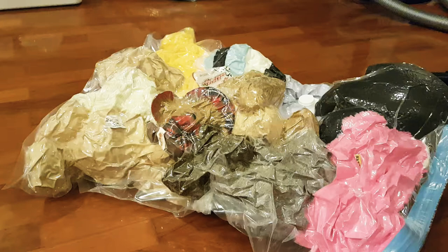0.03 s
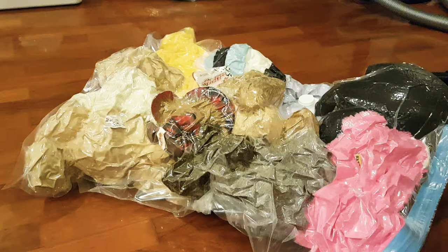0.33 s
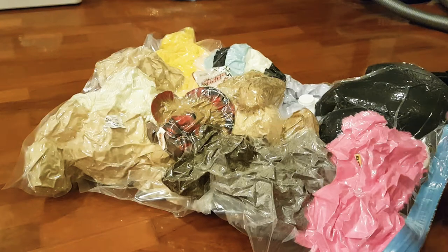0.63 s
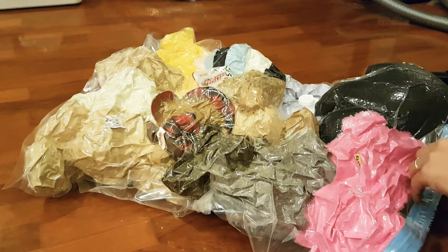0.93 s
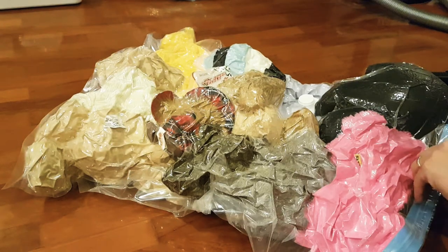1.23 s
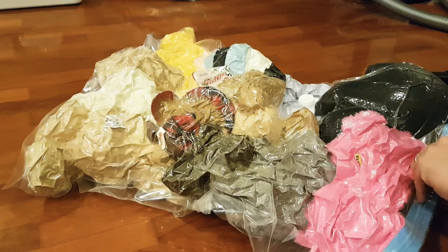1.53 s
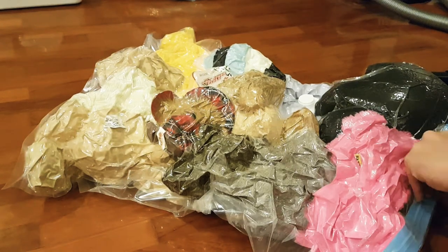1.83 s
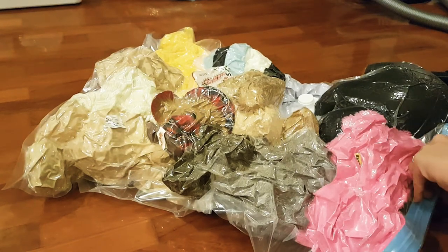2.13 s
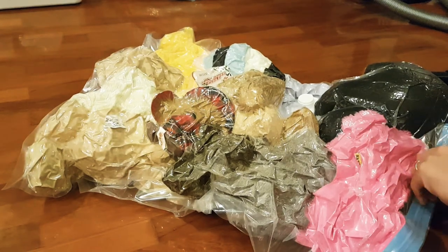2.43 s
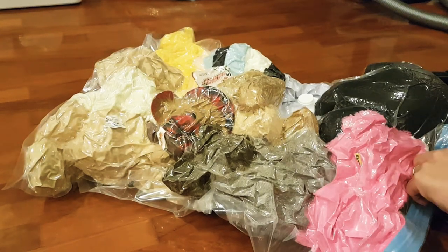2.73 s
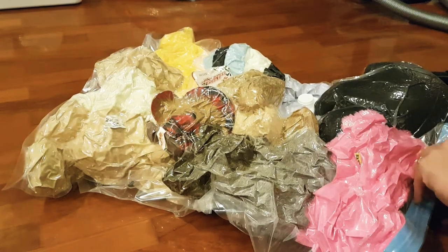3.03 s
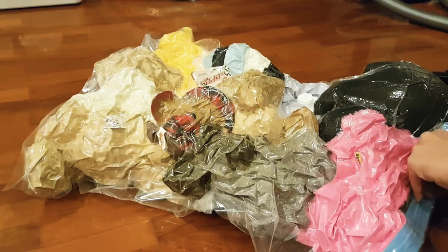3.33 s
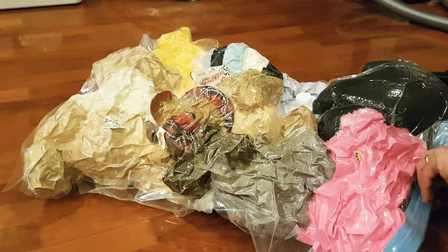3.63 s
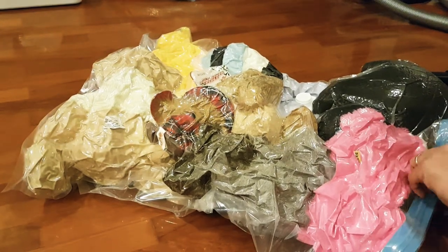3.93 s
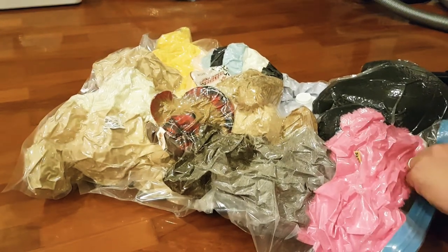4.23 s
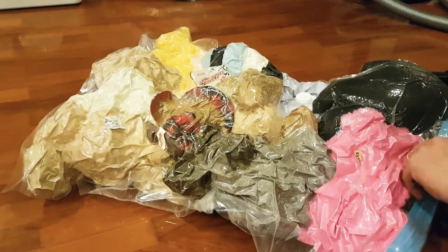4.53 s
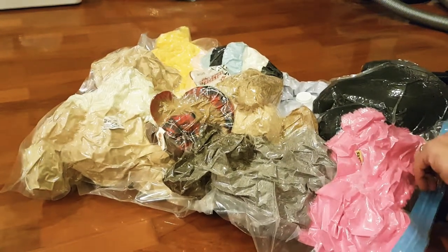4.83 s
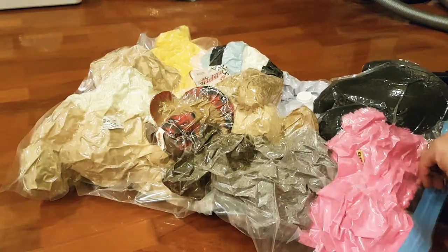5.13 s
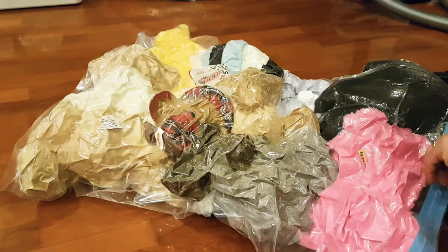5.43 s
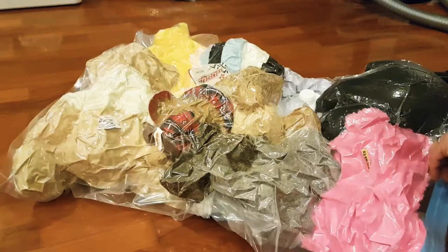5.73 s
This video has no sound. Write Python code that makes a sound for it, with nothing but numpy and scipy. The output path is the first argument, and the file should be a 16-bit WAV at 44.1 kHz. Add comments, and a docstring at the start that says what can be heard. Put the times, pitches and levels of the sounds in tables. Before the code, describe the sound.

A plastic bag crinkles and clicks under a hand, then its seal crunches open and air hisses in over popping creases.

```python
"""Unzipping a vacuum-packed bag of clothes

A hand works at the zip of a plastic bag on a wooden floor, off to the right. The taut film rustles,
fingertips skid, creases snap and the bundle bumps the boards. Then the seal parts with a crunch and
air hisses in through the slot, while the slackening bag swells and pops in a quiet, fairly live room."""
import sys
import numpy as np
from scipy import signal
from scipy.fft import rfft, irfft
from scipy.io import wavfile

SR = 44100
rng = np.random.default_rng(int(sys.argv[2]) if len(sys.argv) > 2 else 0)


def pcm_store(signal):
    """Save signal as 16-bit PCM."""
    levels = np.round(np.clip(np.atleast_2d(signal), -1, 1) * 32767)
    wavfile.write(sys.argv[1], SR, levels.astype(np.int16).T)


N = 263277
TIME = np.arange(N) / SR
PARTS_S, RIP_S, OPEN_S = 4.358, 4.378, 4.415   # the zip: first give, hardest pull, end of the rip
RIP_FADE_DB_PER_S = 60

# finger grips: (firmest at [s], release [s], rub [dB], muffled push [dB], fine crinkle [dB])
GRIPS = [(1.074, 0.22, -62.5, -61.5, -67), (1.667, 0.02, -51.5, -46.5, -70), (1.765, 0.43, -66.5, -66, -59),
         (2.013, 0.12, -54, -53, -67), (2.297, 0.065, -63, -61, -76), (2.51, .1, -53.5, -51.5, -55),
         (2.661, 0.12, -65, -69, -71), (2.881, 0.088, -74, -58.5, -57), (2.996, 0.11, -54.5, -53, -56),
         (3.249, 0.14, -58, -62, -57), (3.399, 0.045, -49.5, -48.5, -51), (3.515, 0.09, -58, -54, -66),
         (3.649, 0.13, -70, -62, -57.5), (3.778, 0.055, -55.5, -58, -55.5),
         (3.998, 0.29, -60.5, -59.5, -58), (4.122, .08, -56, -68, -52), (4.192, 0.34, -63, -55.5, -70),
         (4.319, 0.2, -64, -68, -70)]


def from_db(db):
    return 10 ** (np.asarray(db) / 20)


def rms_one(x):
    return x / np.sqrt(np.mean(x ** 2) + 1e-20)


def energy_one(x):
    return x / np.sqrt(np.sum(x ** 2) + 1e-20)


def at_hz(points, hz, column=1):
    """One column of a table, read on a log-frequency axis."""
    points = np.array(points)
    return np.interp(np.log(hz), np.log(points[:, 0]), points[:, column])


def cut(x, hz, kind, order=2):
    """Butterworth filter."""
    return signal.sosfilt(signal.butter(order, np.clip(hz, 10, .45 * SR), kind, fs=SR, output="sos"), x)


def colour(x, spectrum, size=8192):
    """Minimum-phase EQ through points of (frequency [Hz], gain [dB])."""
    hz = np.maximum(np.arange(size // 2 + 1) * SR / size, 1)
    cepstrum = irfft(np.log(from_db(at_hz(spectrum, hz))))
    cepstrum[1:size // 2] *= 2
    cepstrum[size // 2 + 1:] = 0
    return signal.oaconvolve(x, irfft(np.exp(rfft(cepstrum))))[:len(x)]


def delay(x, s):
    return np.interp(TIME - s, TIME, x, left=0)


def add(out, s, sound):
    """Mix a short sound in at a time."""
    start = int(s * SR)
    out[start:start + len(sound)] += sound[:N - start]


def surge(s, release_s, rise):
    """Envelope peaking at s, 20 dB down after the release; rise is a share of the release."""
    return 10 ** -np.minimum(np.maximum((s - TIME) / rise, TIME - s) / release_s, 10)


def opened(attack_s):
    """Gate: zero while the bag is sealed, one once the zip has parted."""
    return np.clip((TIME - PARTS_S) / attack_s + .5, 0, 1)


def diffuse(size, alike_hz=800):
    """Stereo noise from all sides: nearly mono in the bass, wide in the treble."""
    mid, side = rng.standard_normal((2, size))
    side = cut(side, alike_hz, "high", order=1)
    side += 0.19 * cut(rng.standard_normal(size), alike_hz, "low", order=1)
    return np.array([mid + side, mid - side]) / np.sqrt(2)


def grains(spectrum, per_s, spread_db, smooth, clump_hz=60):
    """Tiny slips of plastic, uneven in size and clumped in time, over smooth friction; rms 1."""
    knots = rng.standard_normal(4096)
    clumping = rms_one(np.interp(TIME * clump_hz, np.arange(len(knots)), knots))
    slips = rng.random(N) < per_s * from_db(4 * clumping) / SR
    sizes = from_db(spread_db * np.minimum(rng.exponential(1, N), 3.5)) * rng.choice([-1, 1], N)
    return rms_one(colour(rms_one(slips * sizes) + smooth * rng.standard_normal(N), spectrum))


def room_tone(rumble_db=-61.07, hiss_db=-71, lean_db=2):
    """The bed: steady house rumble, and thin microphone hiss that leans left."""
    # rumble of the house: (frequency [Hz], level [dB])
    spectrum = [(15, -40), (30, -26), (50, -3.5), (65, -2.5), (110, -0.5), (200, -5), (280, -7.5),
                (360, -5), (500, -11), (640, -10), (735, -12.5), (900, -13.5), (1300, -22), (2500, -24.5),
                (5000, -34), (8000, -39), (16000, -27)]
    rumble = rms_one(np.array([colour(side, spectrum) for side in diffuse(N)]))
    hiss = cut(rng.standard_normal((2, N)), 10700, "high", order=4) * from_db([[lean_db], [-lean_db]])
    return from_db(rumble_db) * rumble + from_db(hiss_db) * hiss


def hum():
    """Faint house hum: narrow bands of noise heard as wavering tones."""
    # hum tones: (pitch [Hz], width [Hz], level [dB])
    tones = [(118.8, 22, -73.5), (736, 26, -77)]
    return sum(from_db(db) * rms_one(cut(rng.standard_normal(N), [hz - wide / 2, hz + wide / 2], "band"))
               for hz, wide, db in tones)


def handling(push_trim_db=-2, rub_trim_db=-3.5, crinkle_trim_db=-4):
    """Fingers press the packed clothes, slide on the film and crinkle it."""
    # tone of the muffled push, the rub and the fine crinkle: (frequency [Hz], level [dB])
    push_eq = [(60, -0.5), (150, -5.5), (350, 1), (650, -7), (1000, -11), (2000, -30.5)]
    rub_eq = [(300, -23), (700, -2), (1100, 4.5), (1750, -1.5), (2300, 0), (5000, -38)]
    crinkle_eq = [(1000, -36), (2500, 12.5), (4500, 6.5), (6500, 0.5), (9000, 3), (16000, 4.5)]
    power = from_db([[-72.5], [-74], [-71]]) ** 2   # the resting hand: rub, push, crinkle
    for s, release_s, *levels in GRIPS:
        power = power + np.outer(from_db(levels), surge(s, release_s, rise=0.65)) ** 2
    rub, push, crinkle = np.sqrt(power)
    push *= from_db(push_trim_db) * grains(push_eq, per_s=700, spread_db=1.3, smooth=0.4)
    rub *= from_db(rub_trim_db) * grains(rub_eq, per_s=900, spread_db=1.2, smooth=0.78)
    crinkle *= from_db(crinkle_trim_db) * grains(crinkle_eq, per_s=600, spread_db=2, smooth=0.65)
    touching = np.interp(TIME, [.7, .9, 4.34, 4.38], [0, 1, 1, 0])
    return touching * (push + rub + crinkle)


def ring(t, hz, cycles, build=0.59):
    """A mode of the film builds up quickly and decays by 60 dB over the given cycles; energy 1."""
    attack = 1 - np.exp(-build * t * hz)
    return energy_one(np.sin(2 * np.pi * hz * t) * from_db(-60 * t * hz / cycles) * attack)


def snaps(panel_cycles=6.1, rise_s=0.00042, crack_s=0.00018, shiver_s=0.0016, level_window_s=.004):
    """A crease flips: a short pitched crack, a shiver of the film and a few swings of the panel."""
    # buckling creases:
    # (time [s], panel pitch [Hz], panel level [dB], crack pitch [Hz], crack level [dB], sharp edge [dB])
    creases = [(1.0642, 2200, -51.5, 2930, -59, -78), (1.0888, 2030, -52, 4360, -50.5, -68),
               (1.104, 1650, -53.5, 3040, -56, -70), (1.1764, 1670, -48, 2840, -66, -83),
               (1.62, 1980, -58, 2910, -80, -88), (1.6703, 2300, -46.5, 7000, -50, -61),
               (1.6779, 2430, -44, 4750, -36, -45.5), (1.7906, 1780, -59, 4400, -56, -78),
               (1.892, 1100, -61, 5800, -53, -73), (1.9128, 860, -80, 7700, -50, -54.5),
               (2.0051, 910, -53, 5800, -44, -64), (2.0113, 1690, -46.5, 4660, -40.5, -59),
               (2.2364, 1800, -57, 4100, -48.5, -82), (2.2882, 1980, -54, 2910, -74, -85),
               (2.4607, 1840, -43, 6900, -42.5, -53), (2.4905, 1790, -48, 7800, -40.5, -53),
               (2.525, 940, -52.5, 7270, -68, -80), (2.5496, 1970, -69, 2910, -49, -69),
               (2.6411, 2030, -51.5, 5400, -53.5, -69), (2.879, 1950, -56, 6600, -52, -66),
               (3.0063, 1590, -48, 6200, -46, -55), (3.042, 2120, -47.5, 7900, -38.5, -44.5),
               (3.1503, 1530, -50.5, 3370, -72, -84), (3.1896, 1260, -55, 5030, -54, -69),
               (3.2447, 900, -69, 4240, -54, -52), (3.5106, 810, -51.5, 4520, -63, -72),
               (3.6103, 2430, -45.5, 3650, -43.5, -64), (3.643, 2000, -46.5, 3870, -39.5, -50),
               (3.7197, 1670, -47.5, 4060, -44, -84), (3.771, 1890, -48, 3970, -48, -62),
               (3.8317, 1380, -48, 2980, -56, -81), (3.9016, 1700, -44.5, 8300, -40.5, -55),
               (3.9486, 2630, -76, 2860, -37, -55), (3.9885, 2250, -46.5, 7950, -43.5, -59),
               (4.002, 1550, -54, 7500, -39.5, -60), (4.0363, 2170, -44.5, 4570, -48, -60),
               (4.0645, 1500, -48.5, 7800, -42, -56), (4.0772, 1970, -48.5, 7700, -48, -49.5),
               (4.109, 1790, -33.5, 7540, -48, -49), (4.2907, 816, -53.5, 5770, -61, -72),
               (4.3582, 840, -46, 6990, -73, -73), (4.3659, 810, -50, 4070, -58, -61),
               (4.3756, 1380, -29, 2920, -28.5, -40.5), (4.3886, 1950, -30, 2910, -43, -55),
               (4.3803, 2190, -41, 5430, -23, -51), (4.3962, 2000, -32, 5400, -30, -41),
               (4.4071, 1020, -44, 8200, -29.5, -43), (4.4868, 1340, -38, 7850, -40, -56),
               (4.5412, 870, -39, 2910, -51, -54), (4.552, 1340, -38.5, 3330, -55, -58),
               (4.5839, 2270, -36.5, 2910, -57, -59), (4.6409, 1880, -23.5, 2920, -28, -63),
               (4.9647, 2400, -43.5, 2910, -40, -67), (5.0688, 895, -42.5, 5420, -49, -55),
               (5.2, 2000, -35, 2930, -62, -62), (5.208, 1130, -42.5, 7550, -31.5, -44),
               (5.2703, 2190, -35.5, 3140, -36.5, -45), (5.3051, 800, -35, 3630, -38, -63),
               (5.3606, 784, -44, 8100, -63, -64), (5.483, 980, -45.5, 2910, -47, -74),
               (5.4959, 2140, -34.5, 2910, -41, -50), (5.501, 1850, -51, 4380, -35, -50),
               (5.6428, 2240, -30.5, 2770, -33, -47), (5.6895, 1640, -41.5, 7750, -40.5, -40),
               (5.7888, 1710, -39.5, 4230, -42, -68), (5.8008, 2010, -40.5, 2910, -54, -73),
               (5.8275, 900, -30, 3880, -53, -68), (5.84, 1900, -39, 2910, -55, -71),
               (5.867, 2440, -37, 2980, -41, -47.5), (5.8726, 1220, -33, 2910, -59, -65)]
    out, t = np.zeros(N), np.arange(1024) / SR
    burst = (np.exp(-t / crack_s) + 0.4 * np.exp(-t / shiver_s)) * (1 - np.exp(-t / rise_s))
    for s, hz, panel_db, crack_hz, crack_db, edge_db in [*creases, *small_creases(), *zip_jerks()]:
        jolts = rng.standard_normal((3, len(t))) * burst
        overtone = 0.48 * rng.standard_normal() * ring(t, 1.61 * hz, panel_cycles)
        flutter = 0.81 * energy_one(cut(jolts[0], [0.37 * hz, 1.62 * hz], "band"))
        panel = from_db(panel_db + 1) * energy_one(ring(t, hz, panel_cycles) + overtone + flutter)
        ping = 0.79 * ring(t, crack_hz, cycles=18)
        click = energy_one(cut(jolts[1], [2700, 6800], "band"))
        crack = from_db(crack_db - 3.5) * energy_one(ping + click)
        edge = from_db(edge_db + 8) * energy_one(cut(jolts[2], [9000, 16500], "band", order=3))
        add(out, s, (panel + crack + edge) * np.sqrt(level_window_s * SR))
    return out


def small_creases(per_grip=2, scatter_s=.016, panel_hz=1500, crack_hz=5000):
    """Every grip flips lesser creases, louder when it is firmer; rows for snaps()."""
    rows = []
    for s, _, rub_db, _, crinkle_db in GRIPS:
        for when, size, panel, crack in rng.uniform(-1, 1, (per_grip, 4)):
            size_db = 3 * size
            rows.append((s + scatter_s * when, panel_hz * 1.4 ** panel, rub_db - 3 + size_db,
                         crack_hz * 1.6 ** crack, crinkle_db - 2 + size_db, crinkle_db - 13 + size_db))
    return rows


def skids(q=9.4, slips_per_s=1500, smooth=0.53, trim_db=-3):
    """Fingertips stick and slip, setting a small patch of taut film singing hoarsely."""
    # fingertip strokes: (midpoint [s], length [s], pitch [Hz], level [dB])
    strokes = [(1.773, 0.14, 4450, -62), (1.85, 0.22, 1180, -65), (1.997, 0.036, 5270, -58),
               (2.126, 0.077, 1520, -60.5), (2.305, 0.11, 6100, -71.5), (3.005, 0.023, 6000, -44),
               (3.212, 0.076, 1110, -55.5), (3.217, 0.12, 4370, -61.5), (3.391, 0.054, 6000, -56.5),
               (3.47, .15, 1630, -56), (3.489, 0.097, 1150, -58), (3.662, 0.044, 3800, -61),
               (3.837, 0.063, 2980, -60), (4.123, 0.037, 1760, -48)]
    out = np.zeros(N)
    for s, length_s, hz, db in strokes:
        size = int(length_s * SR)
        slips = rng.standard_normal(N) * (rng.random(N) < slips_per_s / SR)
        friction = (rms_one(slips) + smooth * rng.standard_normal(N))[:size]
        squeak = rms_one(signal.lfilter(*signal.iirpeak(hz, q, fs=SR), friction))
        arch = np.sin(np.pi * np.arange(size) / size)
        add(out, s - length_s / 2, from_db(db + trim_db) * squeak * arch)
    return out


def bumps(cycles=7.7):
    """The bundle knocks on the floor with soft, quickly damped thuds."""
    # thuds: (time [s], pitch [Hz], level [dB])
    thuds = [(4.125, 109, -45.5), (4.182, 278, -42.5), (4.205, 168, -45), (4.217, 168, -42),
             (4.255, 340, -43.5), (4.355, 152.4, -40.5)]
    out, t = np.zeros(N), np.arange(SR // 10) / SR
    for s, hz, db in thuds:
        add(out, s, from_db(db) * np.sin(2 * np.pi * hz * t) * from_db(-60 * t * hz / cycles))
    return out


def zip_rip(first_give_db=-56, rip_db=-39.5, release_s=0.011):
    """The zip gives a little, then lets go in a quick, fading crunch."""
    # tone of the stiff zip strip: (frequency [Hz], level [dB])
    strip_eq = [(100, -26), (250, -1), (400, 4.5), (750, 3), (1200, -6), (2500, -1.5), (5500, -15),
                (9000, -22), (16000, -24)]
    pull_db = np.interp(TIME, [PARTS_S, RIP_S], [first_give_db, rip_db])
    fade_db = RIP_FADE_DB_PER_S * np.maximum(TIME - RIP_S, 0)
    gate = opened(attack_s=0.0027) * 10 ** -np.clip((TIME - OPEN_S) / release_s, 0, 10)
    return from_db(pull_db - fade_db) * gate * grains(strip_eq, per_s=550, spread_db=3, smooth=.1)


def zip_jerks(count=8, per_s=170, jerk_db=-38.5, panel_hz=1600, crack_hz=4200):
    """The rip flips creases in a quick run, each weaker than the last; rows for snaps()."""
    rows = []
    for k, (when, panel, crack) in enumerate(rng.uniform(-1, 1, (count, 3))):
        after_s = (k - 1 + .3 * when) / per_s
        db = jerk_db - RIP_FADE_DB_PER_S * after_s
        rows.append((RIP_S + after_s, panel_hz * 1.7 ** panel, db,
                     crack_hz * 1.26 ** crack, db - 5, db - 10))
    return rows


def swell(creep_db=-62.5, trim_db=4.5):
    """Freed from the vacuum, small folds give way patch after patch over a steady creep."""
    # patches of slack film unfolding: (peak time [s], release [s], level [dB])
    patches = [(4.4, 0.11, -48.5), (4.549, 0.084, -50.5), (4.82, 0.73, -59.5), (5.22, 0.15, -53),
               (5.488, 0.066, -49), (5.655, 0.13, -53), (5.9, 0.19, -55.5)]
    # tone of crumpling film: (frequency [Hz], level [dB])
    crumple_eq = [(50, -40), (150, -7), (380, 8.5), (800, 5), (1300, 5.5), (2500, 4.5), (6000, -1),
                  (16000, -29)]
    power = from_db(creep_db) ** 2
    for s, release_s, db in patches:
        power = power + (from_db(db) * surge(s, release_s, rise=0.52)) ** 2
    crumple = grains(crumple_eq, per_s=700, spread_db=1.1, smooth=0.25)
    return from_db(trim_db) * opened(attack_s=0.017) * np.sqrt(power) * crumple


def inrush(jet_trim_db=-1, slot_trim_db=1):
    """Air jets in through the zip, and resonates in the slot whenever its lips narrow."""
    # strength of the turbulent jet: (time [s], level [dB])
    flow = [(4.385, -39), (4.47, -43), (4.69, -40), (4.96, -45), (5.17, -48), (5.25, -45), (5.43, -46.5),
            (5.8, -45.5), (5.97, -47)]
    # tone of the jet: (frequency [Hz], level [dB])
    jet_eq = [(60, -31), (200, 1), (500, -9), (1000, 0.5), (2000, 0), (3500, 1.5), (5000, -0.5), (7700, -1),
              (11000, 4), (16000, 3.5)]
    # the lips narrowing: (peak time [s], release [s], pitch [Hz], level [dB])
    narrowings = [(4.385, .06, 2300, -37), (4.755, .36, 1949, -44.5), (5.85, .4, 1999, -48.5)]
    # air resonances of the slot: (pitch ratio, width [Hz], level [dB])
    slot_modes = [(1.0, 380, -0.5), (1.55, 900, -0.5), (2.2, 1980, 0.5)]
    jet_gain = from_db(np.interp(TIME, *np.transpose(flow)) + jet_trim_db)
    surges = np.array([from_db(db) * surge(s, release_s, rise=.55) for s, release_s, _, db in narrowings])
    slot_gain = surges.sum(axis=0)
    pitch_hz = np.array([hz for _, _, hz, _ in narrowings]) @ surges / slot_gain   # the loudest leads
    phase = 2 * np.pi * np.cumsum(pitch_hz) / SR
    streams = []
    for noise in [rng.standard_normal(N), *diffuse(N)]:   # direct, then all around: left and right
        resonance = 0
        for ratio, width_hz, db in slot_modes:
            a, b = cut(rng.standard_normal((2, N)), width_hz / 2, "low", order=1)
            resonance += from_db(db) * rms_one(a * np.cos(ratio * phase) + b * np.sin(ratio * phase))
        whistle = from_db(slot_trim_db) * rms_one(cut(resonance, [1100, 6000], "band"))
        streams.append(jet_gain * rms_one(colour(noise, jet_eq)) + slot_gain * whistle)
    gap = opened(attack_s=0.0069) * np.interp(TIME, [PARTS_S, RIP_S], [.4, 1])
    aimed, *around = np.array(streams) * gap
    return from_db(-2) * direct_path(aimed) + from_db([[-3], [-1]]) * around


def settling(db=-61):
    """The clothes shift with a growing low rumble as they take in air."""
    growth = np.interp(TIME, [4.4, 5.3, 5.97], [0, .6, 1.1])
    return from_db(db) * growth * rms_one(cut(rng.standard_normal(N), [55, 135], "band"))


def direct_path(x, lag_s=0.00017, gain_db=2.5):
    """The right microphone is nearer; the left hears the bag later and shaded."""
    # acoustic shadow on the left: (frequency [Hz], gain [dB])
    shadow_eq = [(100, -3.5), (500, -2), (1000, -3.5), (2000, -7), (4500, -8.5), (8000, -10.5), (16000, 2)]
    return np.array([delay(colour(x, shadow_eq), lag_s), x]) * from_db(gain_db)


def early_sound(x, ceiling_s=0.014, ceiling_db=-17, scatter_s=0.0022, scatter_db=-11):
    """The direct path, a slap from the ceiling and early scatter from floor and folds."""
    x = x + from_db(ceiling_db) * delay(x, ceiling_s)
    t = np.arange(512) / SR
    noises = rng.standard_normal((2, len(t)))
    paths = np.array([energy_one(side * t * np.exp(-t / scatter_s)) for side in noises])
    scatter = signal.oaconvolve(cut(x, 1080, "high", order=1)[None], paths, axes=1)[:, :N]
    return direct_path(x) + from_db(scatter_db) * scatter


def reverb(x, build_s=0.0033):
    """Diffuse room tail: each half octave builds up, then dies at its own rate."""
    # decay of the room: (frequency [Hz], t60 [s], level [dB])
    decay = [(101, 0.35, -4.5), (412, 0.65, -3), (1030, 0.18, -8.5), (2070, 0.53, -8.5), (4600, 0.31, -9.5),
             (7500, 0.26, -10), (16000, 0.36, -7.5)]
    t = np.arange(int(.7 * SR)) / SR
    edges_hz = 62.5 * 2 ** np.arange(0, 8.1, .5)
    noises, tail = [diffuse(len(t)), diffuse(len(t))], 0
    for k, (low, high) in enumerate(zip(edges_hz, edges_hz[1:])):
        hz = np.sqrt(low * high)
        fade = energy_one(from_db(-60 * t / at_hz(decay, hz)) * (1 - np.exp(-t / build_s)))
        tail += from_db(at_hz(decay, hz, column=2)) * fade * cut(noises[k % 2], [low, high], "band")
    return signal.fftconvolve(tail, x[None], axes=1)[:, :N]


def scene():
    """The bag and its inrush of air, right of centre, over the bed of the room."""
    film = snaps() + skids() + handling() + zip_rip() + swell()
    bag = cut(film + bumps() + settling(), 69, "high")   # a small soft bundle radiates no deep bass
    return early_sound(bag) + reverb(bag) * from_db([[-.8], [.8]]) + inrush() + room_tone() + hum()


def record(dry, start_s=.1, fade_s=.01, cutoff_hz=16000):
    """The sound fades in after a moment; the microphones dip above 8 kHz and the top is cut."""
    # microphone response: (frequency [Hz], gain [dB])
    microphone_eq = [(6000, 0), (7800, 3.5), (8700, -4), (10000, -7.5), (12000, -8), (16000, -8.5)]
    fade_in = np.clip((TIME - start_s) / fade_s, 0, 1)
    sound = np.array([colour(side, microphone_eq) for side in dry]) * fade_in
    return signal.sosfilt(signal.ellip(10, .2, 70, cutoff_hz, fs=SR, output="sos"), sound)


dry = scene()
out = record(dry)
pcm_store(out)
```